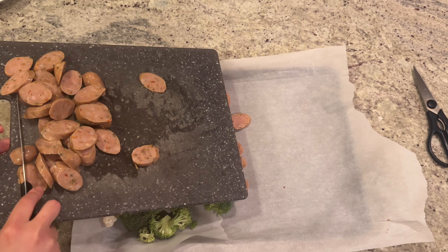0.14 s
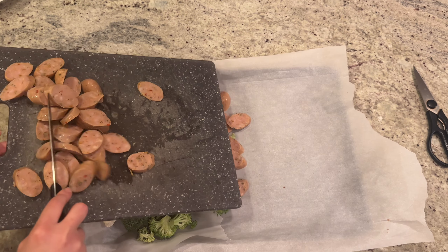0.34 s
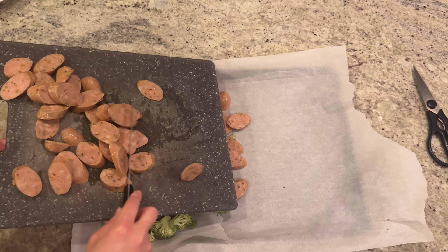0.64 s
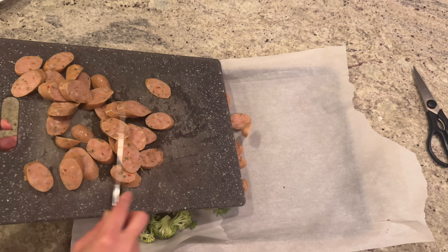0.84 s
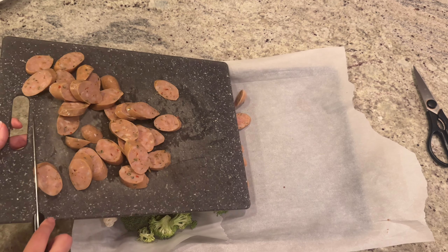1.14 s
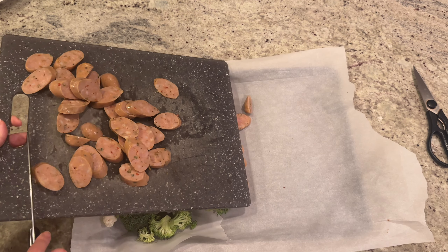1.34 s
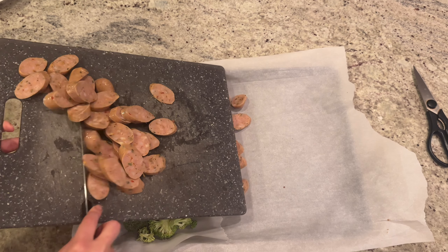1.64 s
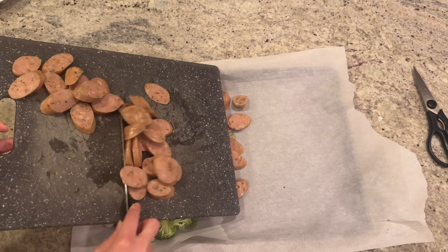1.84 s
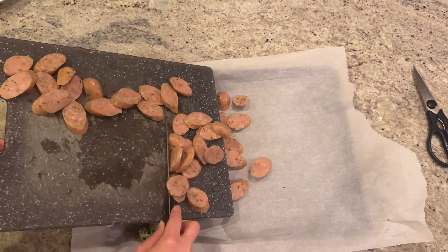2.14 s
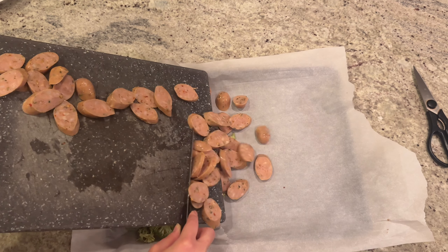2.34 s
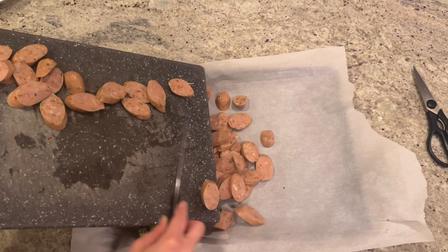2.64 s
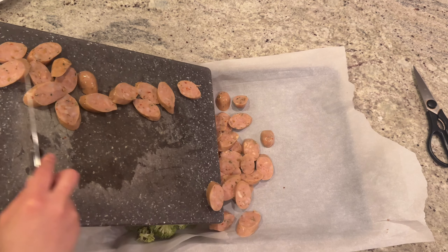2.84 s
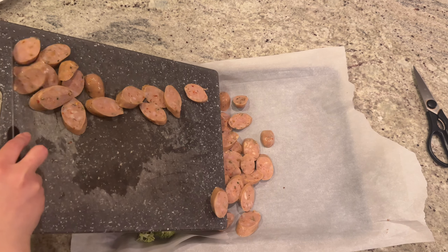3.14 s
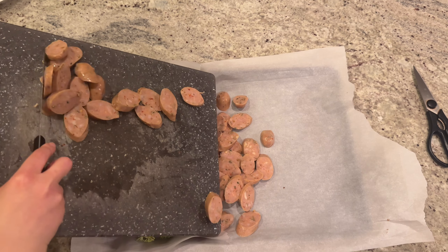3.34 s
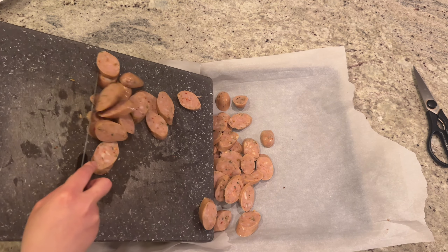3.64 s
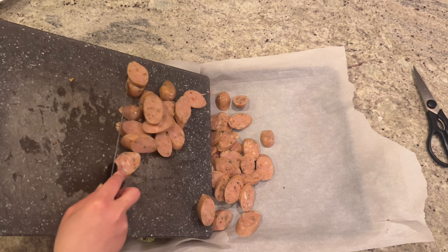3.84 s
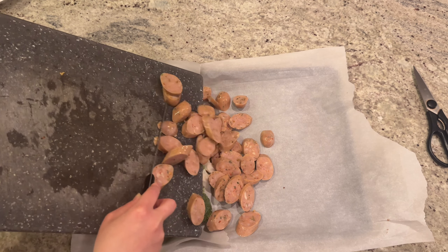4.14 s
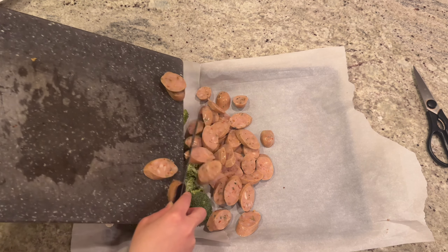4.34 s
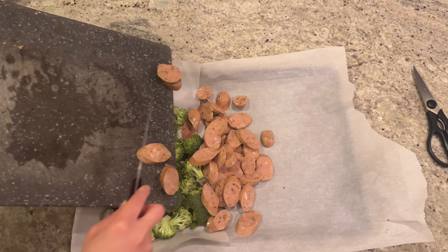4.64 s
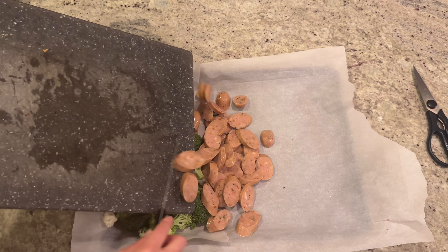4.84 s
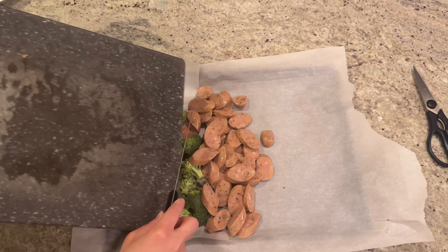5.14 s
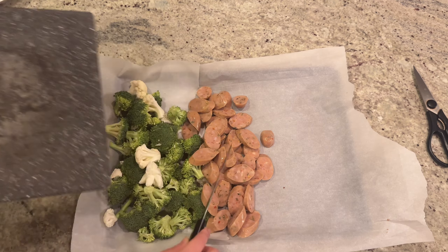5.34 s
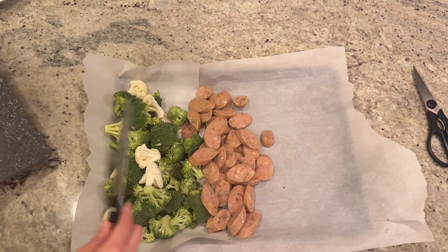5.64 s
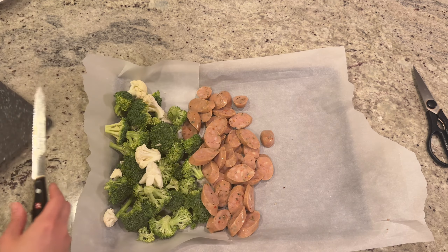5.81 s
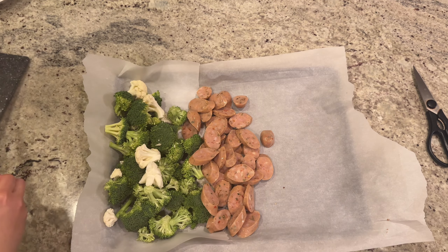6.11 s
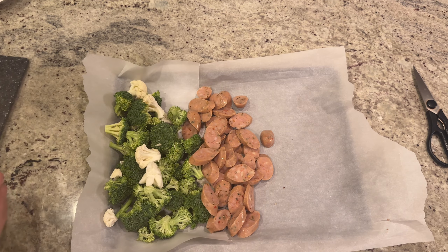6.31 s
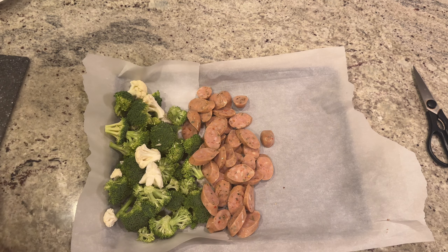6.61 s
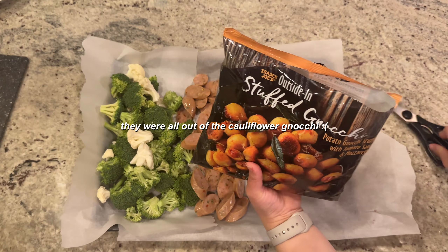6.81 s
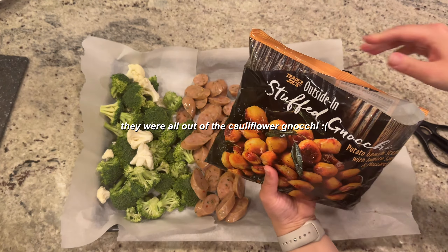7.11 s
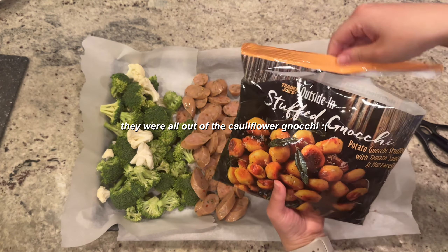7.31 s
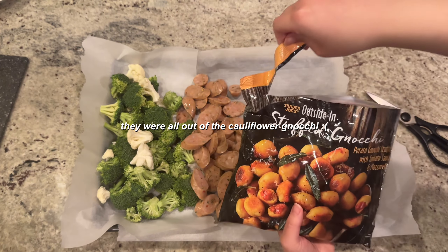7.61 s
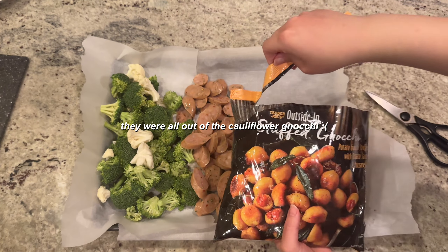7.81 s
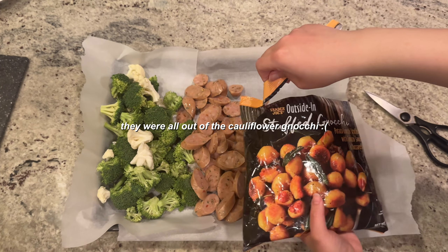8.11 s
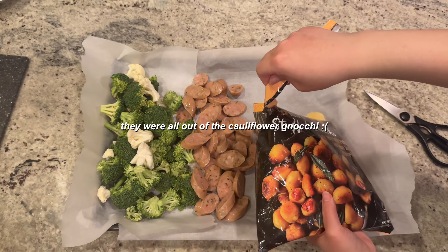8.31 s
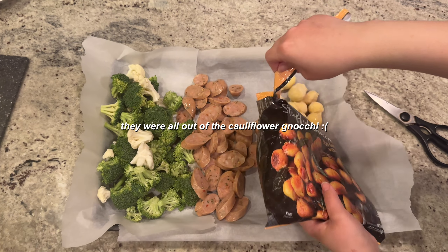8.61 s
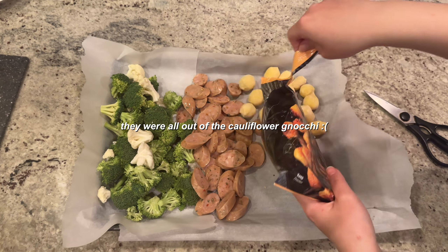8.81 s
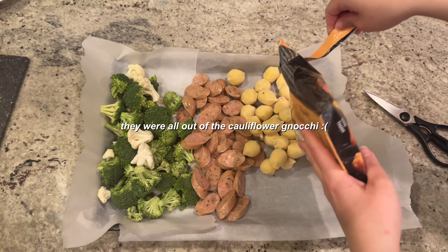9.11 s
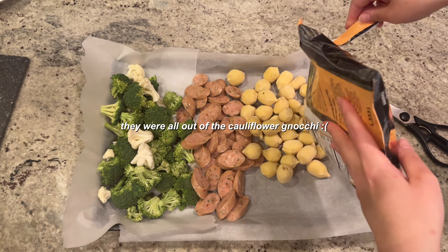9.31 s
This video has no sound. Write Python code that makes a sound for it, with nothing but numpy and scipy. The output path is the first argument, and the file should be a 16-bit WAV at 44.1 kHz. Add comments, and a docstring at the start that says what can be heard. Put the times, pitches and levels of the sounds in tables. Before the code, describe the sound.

In a small hard kitchen, a knife blade scrapes sliced sausage off a plastic board in several rough, chattering pushes, with paper rustles and small snaps between. After a quiet gap with faint light knocks, a plastic bag crinkles, snaps sharply and is shaken empty in dense loud crackles. A low fridge hum and faint room noise continue throughout. Close, stereo phone pickup with short reflections.

```python
"""Slices scraped off a board, then a bag emptied

A knife scrapes sausage slices off a plastic board onto baking paper; a plastic bag is handled and emptied.
Scrapes: random slips and stick-slip jumps drive resonances of board, contact and blade.
Paper and film: noise in tiny random buckles, with single placed snaps and dull knocks.
A fridge hums as two tones over faint room noise, in a small hard kitchen, heard by a phone with two ports.
"""
import sys
import numpy as np
from scipy import signal
from scipy.fft import rfft, irfft
from scipy.io import wavfile
from scipy.ndimage import uniform_filter1d

SR = 44100
rng = np.random.default_rng(int(sys.argv[2]) if len(sys.argv) > 2 else 0)


def log_audio(samples):
    """Write samples as a 16-bit WAV file to the path given in sys.argv[1]."""
    # one column per channel
    frames = np.atleast_2d(samples).T
    # limit to full scale, then quantise
    limited = np.clip(frames, -1, 1)
    pcm = np.round(limited * 32767).astype(np.int16)
    wavfile.write(sys.argv[1], SR, pcm)


N = 417186

# Pushes of the knife. Each row: start in seconds, attack in seconds, hold in seconds, release in dB/s,
# board level in dB, then rub, blade ring and chatter, each in dB over the board.
STROKES = [(1.320, 0.0022, 0.0029, 312, -29, -13, -40, -11),
           (1.34, 0.067, 0.21, 194, -39.5, -8.5, -36, -17.5),
           (1.52, 0.14, 0.31, 124, -33.5, -12.5, -30, -14), (2.14, 0.029, 0.23, 128, -41, -6, -43, -5),
           (3.074, 0.041, 0.18, 400, -42.5, -11, -5.5, -11),
           (3.18, 0.018, 0.012, 300, -45.5, -12, -13, -24), (4.19, 0.028, 0.075, 900, -38.5, 1, -5.5, 4),
           (4.770, 0.0015, 0.041, 201.5, -36.5, -5, -17, 2),
           (4.856, 0.0042, 0.027, 496, -40, 0.5, -11, 6.5)]
# Resonances of board, rubbing contact and blade, and those rung by each jump of the edge.
# Each row: centre in Hz, width of one filter pass in Hz, relative level in dB.
BOARD_MODES = [(388, 175, 3.5), (558, 212, 6), (750, 200, -5.5)]
RUB_MODES = [(1490, 600, -9.5), (2010, 760, -7), (2700, 1200, -15), (5600, 5800, -14)]
BLADE_MODES = [(1460, 320, 15), (2230, 480, 18.5), (3840, 130, 10), (4500, 900, 5), (6050, 600, 1.5)]
JOLT_MODES = [(294, 220, -0.5), (593, 400, 2.5), (1010, 500, 3), (1500, 350, 3), (2600, 1300, -1),
              (3530, 700, -8)]
# Thin high hisses as the knife is put aside. Each row: start in seconds, attack in seconds,
# hold in seconds, release in dB/s, level in dB.
HISSES = [(5.84, 0.095, 0.088, 184, -53), (6.2, 0.035, 0.033, 96, -65)]
# Spells of handling paper, food and bag. Each row: start in seconds, swell in seconds, release in dB/s,
# crackle level in dB, brightness in dB over crackle, body of pan and bag in dB over crackle.
RUSTLES = [(0.261, 0.12, 24, -58, -7.5, 1), (.68, 0.2, 96.5, -63, -2.5, 4), (0.921, 0.11, 90, -42, -4, -5),
           (2.05, 0.089, 92.5, -56, -1, 5), (2.533, 0.045, 378, -35.5, -1.5, -10),
           (2.64, 0.018, 359, -38, 6.5, -4), (2.734, 0.0037, 198, -43.5, 4, -10.5),
           (2.78, 0.064, 55, -54.5, -17, -6), (3.31, 0.027, 11, -61, 3, 4.5),
           (3.65, 0.59, 72, -68.5, 4.5, -9), (4.29, 0.029, 43.5, -54, -11, -8),
           (4.91, 0.0068, 117.5, -52, -6, -1.5), (5.06, 0.027, 61, -52, -15, -9.5),
           (5.778, 0.089, 48.5, -54, -21, 3), (6.756, 0.0062, 41.5, -48.5, -4, 3),
           (6.841, 0.008, 141, -49, 7, 2.5), (7.179, 0.0015, 15, -53, -4, 4),
           (7.38, 0.011, 121.5, -61.5, 17.5, 9.5), (7.601, 0.06, 2, -59, 2.5, 5),
           (9.184, 0.028, 250, -27, 1, -7.5)]
# The bag is tipped and emptied. Each row: time in seconds, crackle level in dB.
POUR = [(7.8, -95), (8.1, -60), (8.25, -41), (8.343, -40), (8.348, -33), (8.55, -34), (8.65, -33.5),
        (8.76, -34), (8.97, -38.5), (9.089, -44.5), (9.13, -49), (9.28, -51.5), (9.46, -41)]
# Crease sizes of the sheet. Each row: pitch in Hz, relative level in dB.
CREASES = [(900, -9.5), (1300, 0.5), (1800, 2.5), (2400, 2.5), (3300, -0.5), (4600, -5.5)]
# Single snaps. Each row: time in seconds, level in dB, centre in Hz, crumpling tail in dB over the snap.
SNAPS = [(0.8648, -26.5, 2440, -1.5), (0.9519, -28.5, 2580, 6.5), (0.9976, -11, 2600, -2),
         (1.1393, -34.5, 2090, 6), (1.264, -21.5, 2230, -10), (1.3203, -19.5, 1940, -31),
         (1.4204, -28.5, 2300, 1), (1.483, -28, 2480, -6), (1.5333, -28, 2800, -11), (2.09, -24, 2740, -5),
         (2.1341, -26.5, 1930, 7.5), (2.5617, -23.5, 2600, 10), (2.651, -21, 2860, 9),
         (2.7518, -18, 2210, -3.5), (3.0711, -21, 2050, -11), (3.27, -56, 2270, -15),
         (3.297, -52, 2380, -14), (3.447, -32.5, 1900, -8), (3.459, -29.5, 2260, 1),
         (3.472, -32.5, 2550, -19), (3.496, -30, 1860, -4), (4.511, -38, 2300, -7),
         (4.7715, -36.5, 2200, -29), (4.8605, -29.5, 2300, -23), (4.9418, -27.5, 2870, -11),
         (4.9661, -30, 2570, -5), (5.016, -31, 2270, 1), (5.056, -24.5, 2504, -1),
         (5.0619, -13.5, 2510, -7.5), (5.0904, -19.5, 2550, -4.5), (5.7796, -37, 2390, 0.5),
         (5.843, -40, 2460, -11), (5.8683, -28, 4470, -25), (5.943, -34, 4940, -31),
         (6.7614, -34, 1220, -16), (6.785, -24.5, 4520, -2), (6.84, -19.5, 1980, -2),
         (6.8644, -18, 6750, -1), (7.186, -24.5, 1240, -12), (7.195, -25.5, 1520, -12),
         (7.205, -28, 1500, -15), (7.222, -41, 3240, -15), (7.247, -31, 1290, -25), (7.276, -40, 2130, -25),
         (7.3108, -26.5, 1390, -6), (7.339, -34, 2200, -23), (7.349, -28, 1560, -12),
         (7.363, -20, 1490, -9), (7.3758, -4.5, 2170, -23), (7.414, -26, 1500, -10),
         (7.472, -23.5, 2330, -10), (7.603, -39, 1760, -12), (7.618, -25, 2540, -30),
         (7.7019, -16.5, 4370, -15), (7.703, -21.5, 1620, -23), (7.7583, -24.5, 960, -22),
         (7.859, -34, 2740, -1), (7.979, -24.5, 1340, -14), (8.0088, -21.5, 835, -21),
         (8.066, -23.5, 940, -25), (8.1015, -22, 2020, -21), (8.136, -25.5, 1170, -8),
         (8.171, -24, 1140, -12), (8.189, -26, 1280, 5.5), (8.253, -16, 1080, 3.5),
         (8.307, -15.5, 1300, -14), (8.3515, -3, 1560, -8), (8.4104, -13, 1330, -2),
         (8.4703, -17.5, 1660, 3), (8.478, -31, 2020, -25), (8.5856, -2, 1870, -6), (8.618, -23, 2900, 3),
         (8.722, -24, 2300, 15), (8.746, -16.5, 1910, 9.5), (8.8165, -6, 1850, -9),
         (8.8996, -12.5, 1890, -4), (8.9563, -9.5, 1700, -3.5), (8.978, -21, 2680, -6),
         (9.073, -31, 6600, 4), (9.1649, -21, 4270, 4), (9.196, -16.5, 4360, 4), (9.22, -16.5, 3600, -4),
         (9.3015, -11.5, 1890, -27), (9.338, -16, 1510, -16), (9.4106, -26.5, 5900, 1)]
# Dull knocks on board, pan and counter. Each row: time in seconds, level in dB, centre in Hz,
# decay time constant in ms.
KNOCKS = [(0.524, -36, 496, 8.2), (5.785, -38.5, 200, 11.5), (5.874, -44.5, 382, 14.4),
          (5.948, -41, 453, 14), (6.292, -46.5, 424, 17), (6.544, -45.5, 170, 12), (6.831, -32, 530, 65),
          (6.878, -31.5, 153, 22), (6.898, -38, 592, 104), (7.19, -24, 263, 3), (7.245, -28.5, 590, 2.9),
          (7.311, -31.5, 587, 12), (7.411, -28, 604, 5.9), (7.474, -34, 560, 7.6), (7.757, -38, 560, 5.6),
          (7.793, -33, 590, 3.9), (7.978, -36, 597, 4.2), (8.592, -33, 163, 16), (8.749, -31, 219, 10)]
# Fridge tones. Each row: frequency in Hz, level in dB rms.
HUM = [(51.1, -48.5), (120.0, -46.5)]
# Spectrum shape of the room noise. Each row: frequency in Hz, relative density in dB per Hz.
AIR_SHAPE = [(35, -22), (60, -18.5), (129, -10.5), (150, -15.5), (175, -16.5), (446, -29), (877, -45.5),
             (3320, -50), (7760, -63.5), (11000, -79.5), (22000, -120)]
# Phase between the ports. Each row: frequency in Hz, lead of the left in radians.
PORT_PHASE = [(200, 0), (340, .1), (690, -.5), (1290, 0), (4050, 0), (6400, -1), (9200, -1.9),
              (12300, -np.pi), (16000, -4.4)]
# Level between the ports. Each row: frequency in Hz, left minus right in dB.
PORT_BALANCE = [(100, 1.8), (700, 2.5), (1300, 0), (15000, 0.5)]
# Response common to both ports. Each row: frequency in Hz, gain in dB.
MIC = [(9000, 0.5), (12500, -12), (15000, 3)]

RANGE_DB = 40  # a sound stops this far below its top
CHATTER_PER_S, CHATTER_SPACING_SPREAD, CHATTER_SCATTER_DB = 215, 0.22, 3
CREASE_WIDTH_SHARE = 0.41  # bandwidth as a share of the pitch
FIRM_GRIP_DB = -54.5
POUR_BRIGHT_DB, POUR_BODY_DB = -0.4, -5.5  # over crackle
# a snap's tick is brightest at this pitch, that of small stiff creases
TICK_DB, TICK_HZ, TICK_DB_PER_OCTAVE = 1, 2620, 14.5
EVENT_SAMPLES = 12288  # longest snap or knock
AIR_DB = -57.5
ROOM_T60_S, ROOM_TREBLE_T60_S, ROOM_DB = 0.47, 0.12, -10.5
TOP_HZ = 16000


def scrape():
    """Patchy slips over the rough board ring board, contact and blade; stick-slip jumps jolt them all."""
    board, rub, blade, jolt = play(STROKES)
    jumps = chatter()
    patches = 4 + unit(grains(45, 3.0, 0.008))
    slips = grains(2500, 2.5, 0.004) * patches
    steel = resonate(slips, BLADE_MODES) + 1.66 * ring(jumps, BLADE_MODES)
    sliding = board * resonate(slips, BOARD_MODES) + rub * resonate(slips, RUB_MODES)
    return sliding + blade * steel + jolt * ring(jumps, JOLT_MODES)


def chatter():
    """The edge sticks and lets go: a train of jumps, uneven in spacing and size."""
    spacing, size = rng.standard_normal((2, N // 100))
    gaps = SR / CHATTER_PER_S * np.exp(CHATTER_SPACING_SPREAD * spacing)
    where = np.cumsum(gaps).astype(int)
    inside = where < N
    out = np.zeros(N)
    out[where[inside]] = undb(CHATTER_SCATTER_DB * size)[inside]
    return out


def crackle():
    """Paper and film buckle over a fine rustle; each crease size pops on its own: small high, large low."""
    middle, bright, body = handling()
    shared = unit(grains(110, 1.9, 0.0092))
    fine = unit(grains(3200, 3.2, 0.0021))
    opposite = rng.standard_normal(N) * np.array([[1], [-1]])
    noise = rng.standard_normal(N) + 0.25 * opposite  # slightly wide
    # a light touch only rustles, a firm grip buckles the sheet
    force = np.clip(middle / undb(FIRM_GRIP_DB), 0.1, 1)

    def pops(per_s, cycles, hz):
        """Noise in buckles that die within a few cycles of their pitch, over the rustle."""
        own = unit(grains(per_s, 4, cycles / hz))
        buckles = 0.3 * shared + 0.7 * own + 0.25 * fine
        return noise * (force * buckles + 0.3 * fine)

    creases = 0
    for hz, db in CREASES:
        lo_hz, hi_hz = hz * (1 - CREASE_WIDTH_SHARE / 2), hz * (1 + CREASE_WIDTH_SHARE / 2)
        creases = creases + undb(db) * unit(band(pops(110, 5, hz), lo_hz, hi_hz))
    treble = unit(band(pops(150, 15, 6300), 4800, 12300))
    bass = unit(band(pops(90, 2.2, 600), 300, 1126))
    hiss = play(HISSES)[0] * resonate(fine, [(5900, 2300, 0)])
    return middle * unit(creases) + bright * treble + body * bass + hiss


def handling():
    """Gains of crackle, brightness and body: short spells, then the long pour."""
    time_s, db = np.transpose(POUR)
    pour_db = np.interp(np.arange(N) / SR, time_s, db, left=-200)
    rows = [(start_s, swell_s, 0, *rest) for start_s, swell_s, *rest in RUSTLES]
    spells = play(rows)[:3]
    return spells + undb(pour_db + np.array([[0], [POUR_BRIGHT_DB], [POUR_BODY_DB]]))


def snaps():
    """A snap is a few cycles falling through its own pitch, a bright tick and a crumpling tail."""
    out, t = np.zeros(N + EVENT_SAMPLES), np.arange(EVENT_SAMPLES) / SR
    for start_s, db, hz, tail_db in SNAPS:
        noise = rng.standard_normal(EVENT_SAMPLES)
        # pitch falls from 1.42 to 0.69 of the centre
        fall = 0.69 * t + 0.0008 * (1 - np.exp(-t / 0.0011))
        pop = np.sin(2 * np.pi * hz * fall) * np.exp(-t / 0.001) * (1 - np.exp(-t / 0.00041))
        treble_db = TICK_DB - TICK_DB_PER_OCTAVE * abs(np.log2(hz / TICK_HZ))
        treble = undb(treble_db) * band(noise, 4500, 12000)
        middle = band(noise, 0.43 * hz, min(2.26 * hz, 0.45 * SR))
        tick = 2.57 * treble * np.exp(-t / 0.00072) + 0.87 * middle * np.exp(-t / 0.0024)
        tick = tick * (1 - np.exp(-t / 0.00039))
        tail = middle * np.exp(-t / 0.014) + 1.88 * treble * np.exp(-t / 0.0053)
        tail = tail * (1 - np.exp(-t / 0.008))
        out[int(start_s * SR):][:EVENT_SAMPLES] += undb(db) * (1.48 * pop + tick + undb(tail_db) * tail)
    return out[:N]


def knocks():
    """A knock is a decaying tone plus low noise, duller and mostly longer than a snap."""
    out, t = np.zeros(N + EVENT_SAMPLES), np.arange(EVENT_SAMPLES) / SR
    fade = np.cos(np.pi / 2 * t / t[-1])  # reaches zero at the end
    onset = 1 - np.exp(-t / 0.0004)
    for start_s, db, hz, ring_ms in KNOCKS:
        noise = band(rng.standard_normal(EVENT_SAMPLES), 0.069 * hz, 1.63 * hz)
        thud = np.sin(2 * np.pi * hz * t) + 3 * noise * np.exp(-t / 0.055)
        decay = np.exp(-1000 * t / max(ring_ms, 1))
        out[int(start_s * SR):][:EVENT_SAMPLES] += undb(db) * thud * decay * fade * onset
    return out[:N]


def fridge():
    """Two steady tones of motor and mains; the level wavers by about half a dB."""
    t = np.arange(N) / SR
    waver = unit(uniform_filter1d(rng.standard_normal((2, N)), size=4000))
    out = 0
    for (hz, db), wobble in zip(HUM, waver):
        out = out + np.sqrt(2) * undb(db + 0.5 * wobble) * np.sin(2 * np.pi * hz * t)
    return out


def air():
    """Faint steady room noise, nearly alike at both ports in the bass and less so above."""
    hz = np.arange(N // 2 + 1) * SR / N
    mid, side = rfft(rng.standard_normal((2, N))) * undb(at(AIR_SHAPE, hz))
    side = np.clip(hz / 900, 0.05, 1.2) * side
    return undb(AIR_DB) * unit(irfft([mid + side, mid - side], N))


def walls(x):
    """Dense echoes, different at each port, build over a few milliseconds; the treble dies first."""
    t = np.arange(SR // 2) / SR
    echoes = rng.standard_normal((2, len(t)))
    low = signal.lfilter([0.3], [1, -0.7], echoes)
    high = echoes - low
    echoes = low * undb(-60 * t / ROOM_T60_S) + high * undb(-60 * t / ROOM_TREBLE_T60_S)
    echoes = echoes * (1 - np.exp(-t / 0.0019))
    return signal.fftconvolve(x[None], unit(echoes) / np.sqrt(len(t)), axes=1)[:, :N]


def play(rows):
    """Attack, hold and release of each row; one gain per level, later levels riding on the first."""
    out = np.zeros((4, N))
    for start_s, attack_s, hold_s, fall_db_s, db, *over_db in rows:
        end_s = start_s + attack_s + hold_s + RANGE_DB / fall_db_s
        here = out[:, int(start_s * SR):int(end_s * SR)]
        t = np.arange(here.shape[1]) / SR
        release = undb(-fall_db_s * np.maximum(t - attack_s - hold_s, 0))
        shape = np.minimum(t / attack_s, 1) * release
        here[:1 + len(over_db)] += shape * undb(db + np.array([0, *over_db]))[:, None]
    return out


def grains(per_s, scatter_db, tail_s):
    """Envelope of random slips or buckles: many small, few large, each dying fast."""
    size_db = scatter_db * np.minimum(rng.exponential(size=N), 2.5)
    hits = (rng.random(N) < per_s / SR) * undb(size_db)
    return signal.lfilter([1], [1, -np.exp(-1 / (tail_s * SR + 1))], hits)


def twice(x, hz, width_hz):
    """One resonance, applied twice for steep skirts, scaled to rms 1."""
    peak = signal.iirpeak(hz, hz / width_hz, SR)
    return unit(signal.lfilter(*peak, signal.lfilter(*peak, x)))


def resonate(drive, modes):
    """Each resonance is shaken by its own noise under a common envelope."""
    out = 0
    for hz, width_hz, db in modes:
        out = out + undb(db) * twice(drive * rng.standard_normal(N), hz, width_hz)
    return unit(out)


def ring(pulses, modes):
    """All resonances are struck by the same jumps, neighbours in opposite sense."""
    out = 0
    for k, (hz, width_hz, db) in enumerate(modes):
        out = out + (-1) ** k * undb(db) * twice(pulses, hz, width_hz)
    return unit(out)


def undb(db):
    """Decibels to gain."""
    return 10 ** (np.asarray(db) / 20)


def unit(x):
    """Scale to rms 1."""
    return x / np.sqrt(np.mean(x ** 2))


def at(table, hz):
    """Read a (Hz, value) table on a log axis."""
    table_hz, value = np.array(table).T
    return np.interp(np.log(hz + 1), np.log(table_hz), value)


def band(x, lo_hz, hi_hz):
    """Band-pass."""
    return signal.sosfilt(signal.butter(2, [lo_hz, hi_hz], "bandpass", fs=SR, output="sos"), x)


def scene():
    """The hands' work reaches both ports directly and again off the walls, over fridge and air."""
    work = scrape() + crackle() + snaps() + knocks()
    return work + undb(ROOM_DB) * walls(work.mean(axis=0)) + fridge() + air()


def record(dry):
    """The ports differ in level and phase, nearly opposite around 12 kHz; then the top is cut."""
    hz = np.arange(N // 2 + 1) * SR / N
    # each port takes half of the difference
    half = undb(at(PORT_BALANCE, hz) / 2) * np.exp(0.5j * at(PORT_PHASE, hz))
    ports = irfft(rfft(dry) * undb(at(MIC, hz)) * [half, 1 / half], N)
    return signal.sosfilt(signal.ellip(8, 0.2, 70, TOP_HZ, fs=SR, output="sos"), ports)


dry = scene()
out = record(dry)
log_audio(out)
```